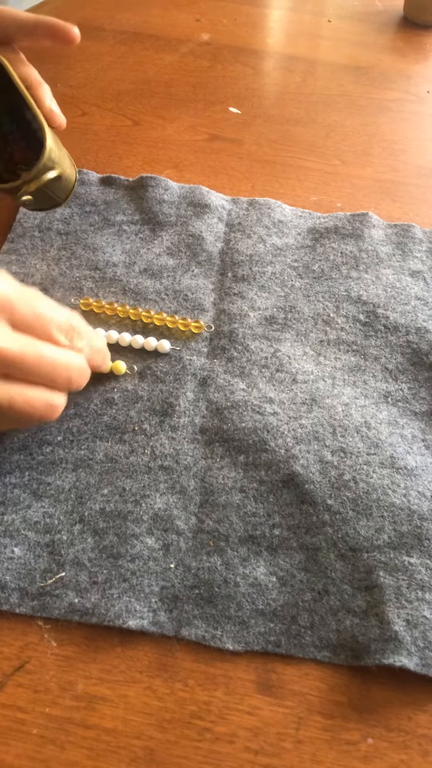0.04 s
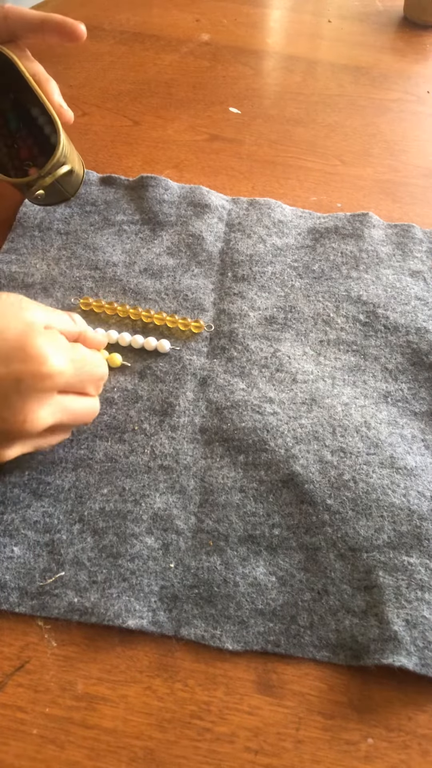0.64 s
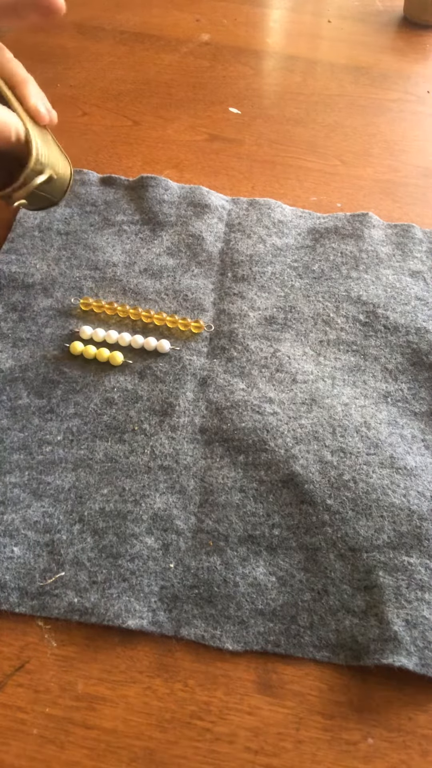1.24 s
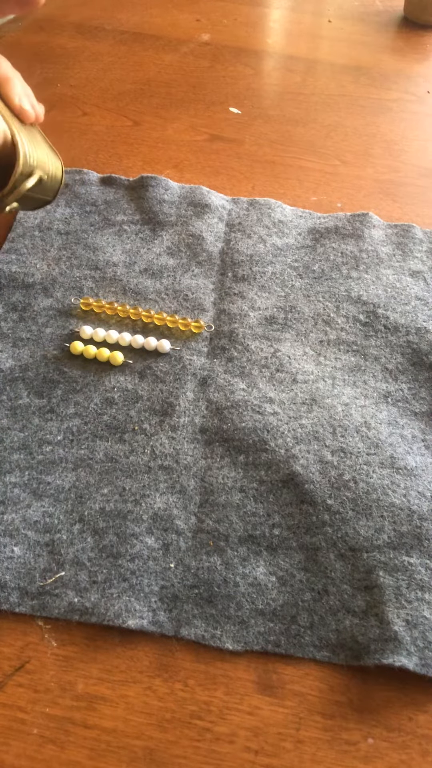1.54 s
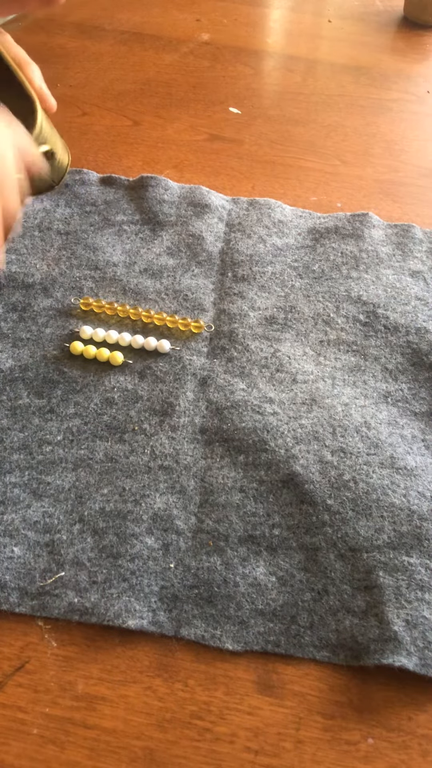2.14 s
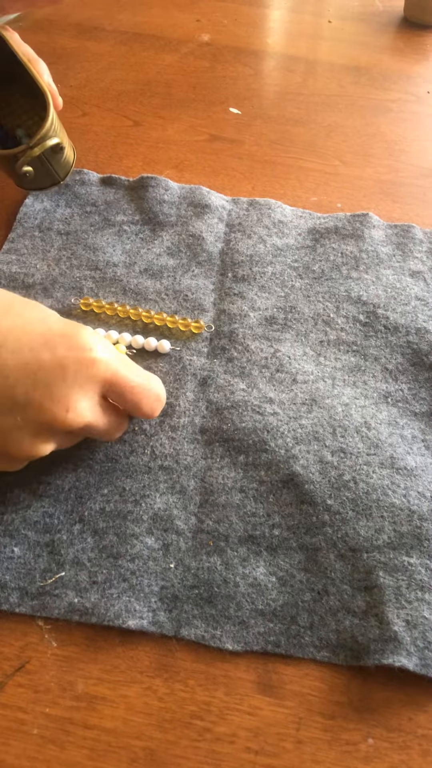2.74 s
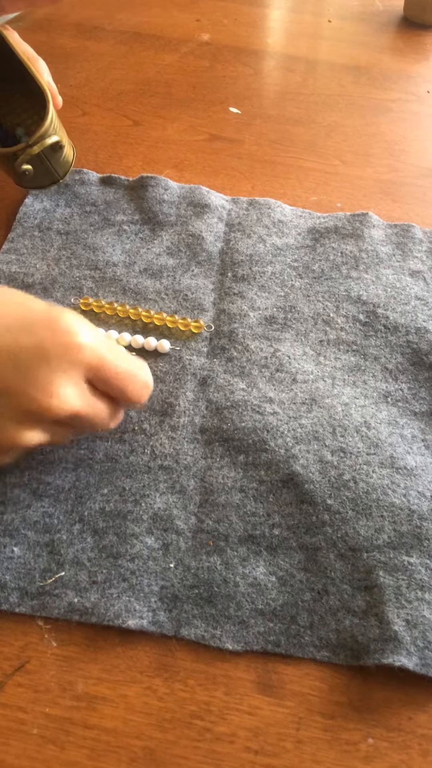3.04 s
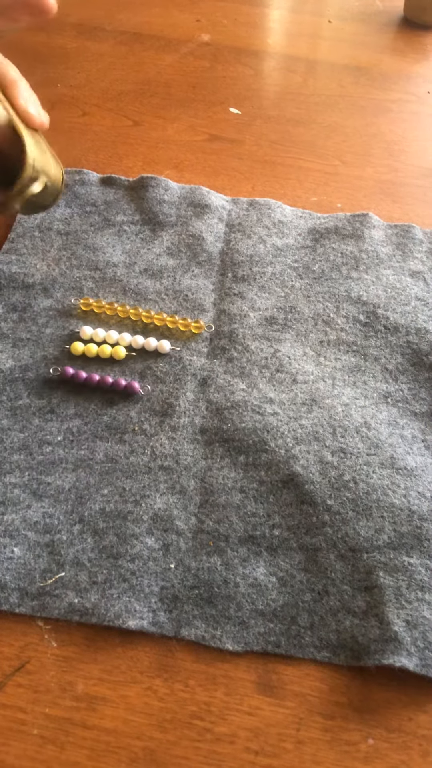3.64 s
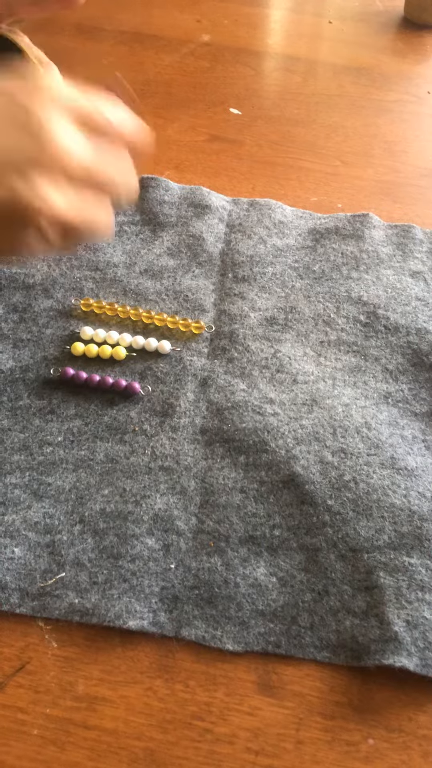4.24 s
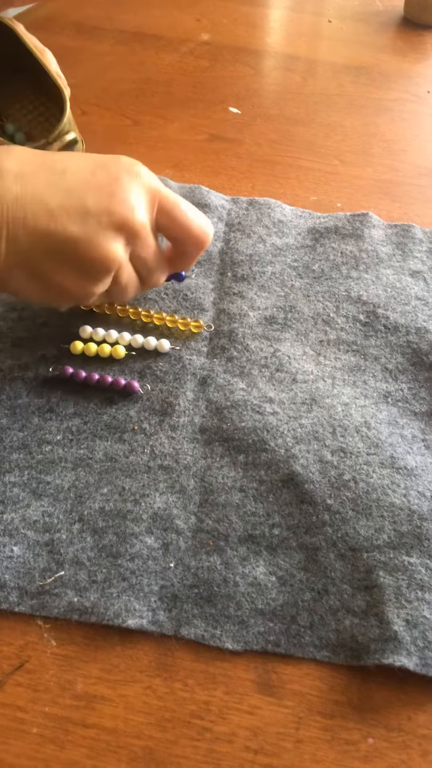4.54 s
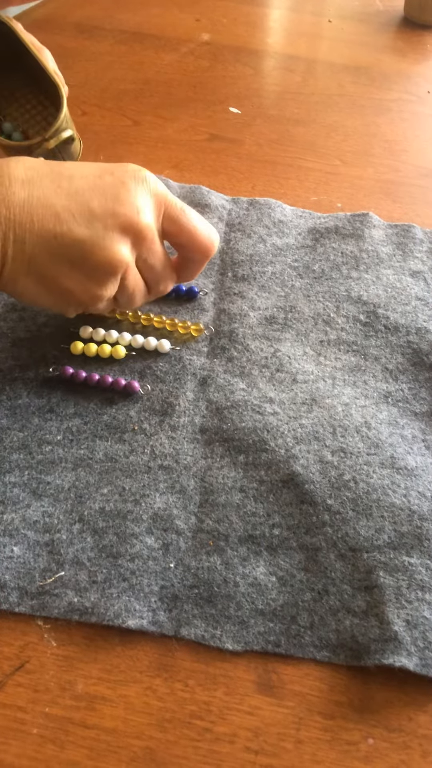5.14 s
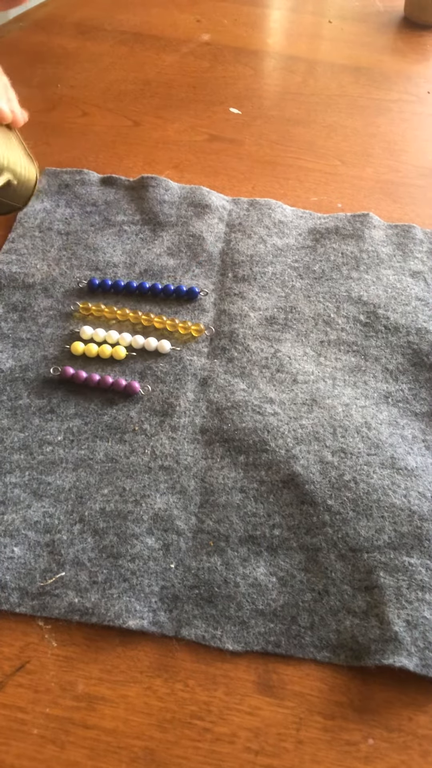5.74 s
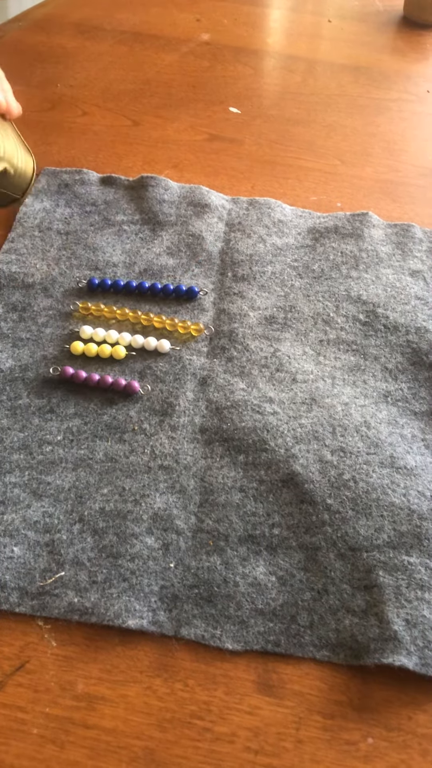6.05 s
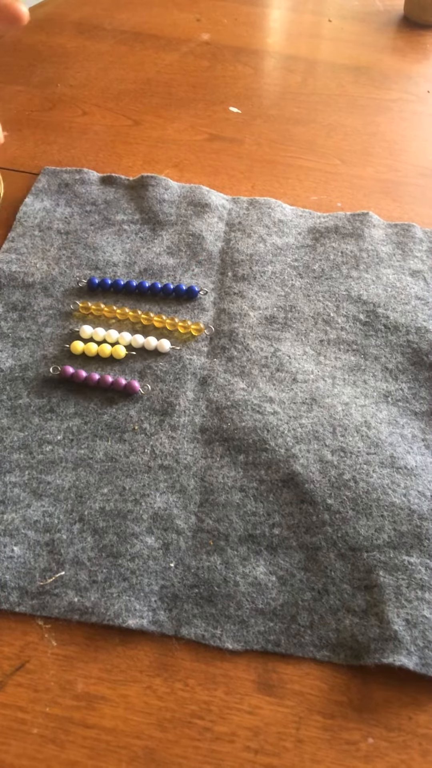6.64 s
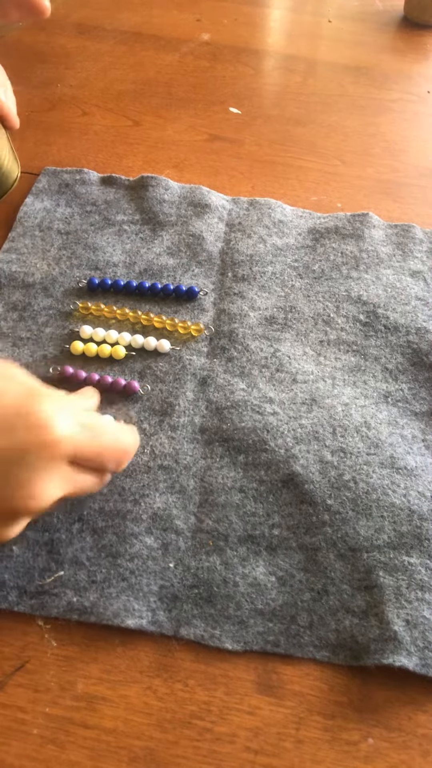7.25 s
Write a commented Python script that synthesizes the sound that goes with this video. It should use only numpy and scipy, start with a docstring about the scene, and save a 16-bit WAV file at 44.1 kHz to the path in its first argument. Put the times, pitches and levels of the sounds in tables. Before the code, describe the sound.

Fingers pick bead bars out of a small metal tin three times. Each time the beads clack against each other and the wall for about a second, rattling finely and making the tin ring briefly at a slightly different pitch. In the pauses come faint ticks of beads on a felt mat and soft bumps on the table. The room is small, with a short echo, low hum and microphone hiss.

```python
"""Small room, table with a felt mat. Fingers pick bead bars out of a small metal tin, three times.
Beads clack on each other and the wall, ringing the tin, and rattle finely as they roll. The tin is
held level, then leaning, then tipped; each grip has its own resonances. Faint ticks and a brush on
the mat, soft bumps on the table. Short room echo; behind it low air, hum and microphone hiss."""
import sys
import numpy as np
from scipy import signal
from scipy.fft import rfft, irfft
from scipy.io import wavfile

SR = 44100
rng = np.random.default_rng(int(sys.argv[2]) if len(sys.argv) > 2 else 0)


def inscribe(sig):
    """Save sig as 16-bit PCM at rate SR to the path in sys.argv[1].

    A 1-D sig is mono; a 2-D sig holds one channel per row.
    Samples are clipped to [-1, 1] before scaling.
    """
    pcm = np.round(np.clip(np.atleast_2d(sig).T, -1, 1) * 32767)
    wavfile.write(sys.argv[1], SR, pcm.astype(np.int16))


N = 321048
TIME_S = np.arange(N) / SR
LEAD_SAMPLES = 512  # scrape ahead of each contact

# bar strikes: t/s, crack level/dB, hollow/dB, wall/dB, edge/dB (these three added to level), clink f/Hz
STRIKES = [(1.089, -34, -15, -6, -19, 3750), (1.104, -29.5, -11.5, -9.5, -17, 2440),
           (1.175, -33, -23, -2.5, -15, 2350), (1.2213, -35, -20.5, -2, -17, 3370),
           (1.241, -29.5, -28, -7, -20, 2260), (1.27, -23, -12, -8, -15.5, 3470),
           (1.2885, -24.5, -9, -14, -13.5, 2300), (1.294, -15, -25, -10, -15.5, 2325),
           (1.308, -19.5, -18, -11.5, -10.5, 3300), (1.346, -21.5, -17.5, -13.5, -12.5, 6700),
           (1.353, -19, -20.5, -7, -11.5, 2240), (1.3763, -26.5, -16, -1.5, -9.5, 3150),
           (1.409, -30.5, -25, -1, -12.5, 3350), (1.4318, -23, -18, -6.5, -19.5, 2180),
           (1.4919, -17, -16, -13, -11.5, 7040), (1.503, -26, -12.5, -13, -8.5, 6130),
           (1.627, -24.5, -5.5, -14, -17.5, 2120), (1.6379, -13.5, -8, -12, -10.5, 2013),
           (1.681, -25.5, -23, -21.5, -11.5, 5800), (1.791, -42.5, -18, 1, -12, 2080),
           (1.843, -42, -18, -16, -10, 3620), (1.8588, -30.5, -14.5, -6.5, -15.5, 2180),
           (1.913, -31.5, -24, -10, -18, 3650), (1.9464, -28.5, -8, -13.5, -21, 5180),
           (1.9867, -36.5, -14, -6, -10, 5100), (2.048, -23, -30, -15, -14, 5210),
           (3.547, -25, -14.5, -12, -19.5, 4930), (3.554, -33, -17, -9, -13, 2360),
           (3.649, -25, -11.5, -19, -14, 3980), (3.663, -14, -17.5, -15, -11.5, 2390),
           (3.6705, -24, -8.5, -11.5, -8.5, 2210), (3.7155, -19.5, -28.5, -10.5, -14.5, 2110),
           (3.7265, -22.5, -18.5, -16, -16, 4640), (3.7627, -24, -9.5, -10.5, -20, 2300),
           (3.7852, -20.5, -6.5, -5, -20, 1990), (3.791, -13, -27, -24, -12.5, 4750),
           (3.796, -14.5, -19, -20.5, -15, 3740), (3.911, -25, -13.5, -8, -17, 3690),
           (3.9443, -20.5, -12.5, -7.5, -12, 1916), (4.0405, -27.5, -20, -20, -9, 6660),
           (4.0511, -26.5, -23, -15.5, -10, 4500), (5.77, -35, -12, -14, -27, 1870),
           (5.785, -33.5, -15, -14, -12.5, 2460), (5.816, -28, -16.5, -22.5, -15, 4640),
           (5.924, -21, -37, -15.5, -15, 4700), (5.9417, -19.5, -27.5, -13.5, -15.5, 4680),
           (6.023, -22.5, -33, -10, -1, 8100), (6.036, -9.5, -24.5, -19, -15.5, 2180),
           (6.203, -18.5, -26, -10, -10.5, 4880), (6.234, -19, -22, -18, -9.5, 7640),
           (6.2435, -17.5, -22.5, -9, -13.5, 2140), (6.251, -22, -11, -4.5, -11, 1944),
           (6.3295, -34, -26.5, -3.5, -16, 2220), (6.348, -25, -25, -19.5, -6.5, 5110),
           (6.453, -41.5, -19, -18, -8, 6400), (6.492, -44.5, -15, -7, -13.5, 2300),
           (6.542, -30, -29, -12, -13.5, 7500), (6.588, -29.5, -29, -11, -15, 4470),
           (6.625, -18.5, -23.5, -4.5, -13, 1947), (6.631, -16.5, -18.5, -23.5, -15, 1906),
           (6.655, -16, -25, -22.5, -11.5, 5000), (6.674, -27.5, -17, -23, -13, 3610),
           (6.7923, -48, -8, -0.5, -5, 2430)]
# limits of the hollow, wall, crack and edge bands: f/Hz
BAND_EDGES_HZ = [400, 1500, 3000, 8000, 16500]
# dead knock of a bead: f/Hz, level/dB
BEAD_SPECTRUM = [(200, -31.5), (500, -15.5), (1000, -4.5), (1600, -12.5), (2500, -7), (5000, -3),
                 (8000, -5), (8700, -10.5), (12000, -13), (16000, -15.5)]
# tin resonances, one table per grip: f/Hz, width/Hz, level/dB
LEVEL_MODES = [(584, 230, -5), (984, 120, 10), (1141, 87, 10), (1440, 110, -13.5), (2080, 47, -2),
               (2204, 97, -2), (2300, 76, -2.5), (2800, 66, -6.5), (3290, 110, 0.5), (3560, 150, 4),
               (3970, 200, 0.5), (4633, 160, 2), (4990, 93, 5.5), (5900, 200, -2), (6660, 240, 2),
               (7740, 460, -4), (10450, 500, -13.5)]
LEANING_MODES = [(573, 180, -3), (962, 71, 1), (1125, 70, 8), (1386, 35, 1), (1940, 31.7, -1),
                 (2204, 170, 0), (2800, 130, -5.5), (3544, 103, 3), (4000, 190, -1), (4700, 130, -0.5),
                 (4930, 130, -0.5), (5840, 140, -5), (8200, 380, -10.5)]
TIPPED_MODES = [(578, 45, -1), (836, 35, -17), (994, 48, 4.5), (1150, 48, -1), (1292, 54, 4.5),
                (1414, 16, 2), (1620, 28, -11), (1984, 59, 2.5), (2244, 110, 1), (2420, 140, 0),
                (2700, 150, -0.5), (3910, 140, 2.5), (5020, 210, 2.5), (5630, 210, -6), (6620, 400, -2.5),
                (7840, 230, -2)]
GRIP_MODES = [LEVEL_MODES, LEANING_MODES, TIPPED_MODES]
# level to leaning, leaning to tipped: t/s
GRIP_CHANGES_S = [3, 5]
# fingers pushing bars round the tin: t/s, length/s, level/dB
STIR_STROKES = [(1.1, 0.079, -50), (1.194, .008, -39), (1.298, 0.11, -39.5), (1.471, 0.13, -44.5),
                (1.572, .04, -49), (1.612, 0.013, -31), (1.655, 0.019, -35.5), (1.797, .1, -51),
                (1.91, .06, -45), (2.077, 0.044, -52.5), (3.41, 0.094, -59), (3.54, 0.0067, -40),
                (3.652, 0.019, -31.5), (3.69, 0.018, -42.5), (3.835, .015, -38), (3.87, .17, -42),
                (5.745, 0.05, -48.5), (5.902, .005, -52), (5.96, .025, -50), (6.014, 0.031, -35.5),
                (6.153, 0.034, -45.5), (6.196, 0.049, -30.5), (6.30, 0.058, -44), (6.579, 0.022, -43),
                (6.657, .11, -46.5)]
# beads touching on the mat: t/s, level/dB
MAT_TICKS = [(0.3443, -49.5), (.902, -59), (2.683, -52), (3.4195, -55), (4.268, -43.5), (4.278, -54),
             (4.881, -60), (6.41, -43)]
# one such tick: f/Hz, level/dB
TICK_SPECTRUM = [(500, -27.5), (2000, -12), (4000, -4), (6500, 6), (10000, -9), (16000, 1)]
# hand and tin on the table, thump then drag: t/s, length/s, level/dB
BUMP_STROKES = [(4.128, .017, -45), (5.25, .27, -57)]
# table thump: f/Hz, level/dB
BUMP_SPECTRUM = [(50, -20.5), (105, -0.5), (160, -3), (220, -4), (290, 1), (420, -12.5), (900, -20),
                 (3000, -45)]
# fingers on felt: t/s, length/s, level/dB
BRUSH_STROKES = [(5.33, .10, -71)]
# felt friction: f/Hz, level/dB
FELT_SPECTRUM = [(1000, -14), (4000, 1), (7000, 1), (11000, -9), (16000, -17)]
# room decay: f/Hz, T60/s
ROOM_T60_S = [(300, 0.09), (1200, 0.45), (3500, 0.29), (7000, 0.2), (14000, 0.21)]
# room air: f/Hz, relative level/dB
AIR_SPECTRUM = [(12, -55), (20, -30), (38, -20.5), (59, -7), (86, -12), (119, 1), (170, -5), (189, -4),
                (275, -10.5), (315, -10), (429, -12), (615, -13.5), (670, -15.5), (782, -12.5),
                (1200, -21.5), (1560, -59), (2640, -120)]
# room hum: f/Hz, width/Hz, level/dB
HUM_LINES = [(77.5, 3.4, -63), (117.5, 4.8, -61.2), (204.5, 6.4, -65), (230.9, 5.1, -65.5),
             (275.3, 10, -62.5)]
# microphone hiss: f/Hz, relative level/dB
HISS_SPECTRUM = [(700, -6.5), (1200, 4), (2000, 0), (4000, -7), (6000, -13.5), (7000, -11), (7750, -4),
                 (8300, -14), (9500, -21), (15500, -25.5), (16200, -35)]


def clacks(hollow_db=-8, wall_db=-8.5, crack_db=-17, edge_db=-7.5, grip_detune=0.0084, rms_window_s=0.025):
    """Each strike rings the tin, slightly retuned by the fingers; the spot hit sets the band balance."""
    out = np.zeros(N)
    bands_hz = zip(BAND_EDGES_HZ, BAND_EDGES_HZ[1:])
    filters = [signal.butter(3, band_hz, "band", fs=SR, output="sos") for band_hz in bands_hz]
    for t_s, level_db, hollow, wall, edge, clink_hz in STRIKES:
        modes = GRIP_MODES[np.searchsorted(GRIP_CHANGES_S, t_s)]
        tin = impulse_response(BEAD_SPECTRUM, modes, detune=grip_detune * rng.uniform(-1, 1))
        force = clink(chatter(contact_ms=1.38), clink_hz, ping_db=-11)
        ring = signal.fftconvolve(force, tin)
        offsets_db = [hollow + hollow_db, wall + wall_db, crack_db, edge + edge_db]
        for k, (sos, offset_db) in enumerate(zip(filters, offsets_db)):
            band = (-1) ** k * unit_energy(signal.sosfilt(sos, ring))  # alternating polarity
            gain = amp(level_db + offset_db) * np.sqrt(rms_window_s * SR)
            add(out, t_s - LEAD_SAMPLES / SR, gain * band)
    return out


def chatter(contact_ms, buzz_db=-17, buzz_ms=2.9, scrape_db=-14, scrape_ms=2.56):
    """Force of a landing bar: a scrape, a quick cluster of bead hits, then buzz on the wire."""
    t_ms = (np.arange(2048) - LEAD_SAMPLES) * 1000 / SR
    progress = abs(t_ms) / contact_ms
    hits = (0.1 + progress) * np.exp(-progress)
    buzz = amp(buzz_db) * np.exp(-abs(t_ms) / buzz_ms)
    scrape = amp(scrape_db) * np.exp(-abs(t_ms) / scrape_ms)
    return unit_energy(rng.standard_normal(len(t_ms)) * np.where(t_ms < 0, scrape, hits + buzz))


def clink(force, f_hz, ping_db, t60_s=0.016, rise_s=0.00073):
    """The struck spot adds a brief ping at its own pitch."""
    t_s = np.maximum(np.arange(len(force)) - LEAD_SAMPLES, 0) / SR
    envelope = amp(-60 * t_s / t60_s) * (1 - np.exp(-t_s / rise_s))
    ping = np.sin(2 * np.pi * f_hz * t_s) * envelope
    return force + amp(ping_db) * unit_energy(ping)


def impulse_response(spectrum, modes=(), detune=0):
    """A struck body: broad knock plus ringing modes, shifted by the fraction detune."""
    f_hz = abs(np.fft.fftfreq(4096, 1 / SR))
    power = amp(lookup(spectrum, f_hz)) ** 2
    for mode_hz, width_hz, level_db in modes:
        offset_sq = ((f_hz - mode_hz * (1 + detune)) / width_hz) ** 2
        power += amp(level_db) ** 2 / (1 + 4 * offset_sq) / (1 + offset_sq / 4)
    minimum_phase = np.exp(np.conj(signal.hilbert(np.log(power) / 2)))
    return unit_energy(np.fft.ifft(minimum_phase).real)


def rolling(gain_db=-3, scrape_db=-12, lowpass_hz=12000, spread_db=17, touches_per_s=8):
    """Stirred beads: many small contacts at 24 clink pitches ring the tin, over fine scraping."""
    contacts = np.zeros(N)
    touches_per_pitch = int(touches_per_s * N / SR)
    for clink_hz in np.geomspace(2000, 8000, 24):
        touch = clink(chatter(contact_ms=1.0), clink_hz, ping_db=-8.5)
        for t_s, level_db, side in rng.random((touches_per_pitch, 3)) * [N / SR, spread_db, 2]:
            add(contacts, t_s, amp(level_db) * np.sign(side - 1) * touch)
    force = unit_rms(contacts) + amp(scrape_db) * rng.standard_normal(N)
    lowpass = signal.butter(1, lowpass_hz, fs=SR, output="sos")  # the rolling's treble is gently darkened throughout
    force = signal.sosfilt(lowpass, force)
    out = np.zeros(N)
    for grip, modes in enumerate(GRIP_MODES):
        strokes = [row for row in STIR_STROKES if np.searchsorted(GRIP_CHANGES_S, row[0]) == grip]
        drive = force * stroke_envelope(strokes, rise_s=0.0035, fall_s=0.015)
        out += signal.oaconvolve(drive, impulse_response(BEAD_SPECTRUM, modes))[:N]
    return amp(gain_db) * out


def mat_and_table(tick_gain_db=15):
    """Fingers brush the felt, hand and tin bump the table, beads tick together on the mat."""
    brush = noise(FELT_SPECTRUM) * stroke_envelope(BRUSH_STROKES, rise_s=0.024, fall_s=0.021)
    bumps = noise(BUMP_SPECTRUM) * stroke_envelope(BUMP_STROKES, rise_s=0.0082, fall_s=0.017)
    ticks = np.zeros(N)
    for t_s, level_db in MAT_TICKS:
        force = chatter(contact_ms=0.4, buzz_db=-27, scrape_db=-35)
        tick = signal.fftconvolve(force, impulse_response(TICK_SPECTRUM))
        add(ticks, t_s - LEAD_SAMPLES / SR, amp(level_db + tick_gain_db) * tick)
    return brush + bumps + ticks


def room(x, tail_db=-8, onset_s=0.0012, early_db=-13, early_peak_s=0.0029, echoes_per_s=1500):
    """Sparse echoes off the table and near things, plus a tail lasting longest in the mids."""
    size = 26000
    t_s = np.arange(size) / SR
    f_hz, frame_s, frames = signal.stft(rng.standard_normal(size), SR, nperseg=256)
    decay = amp(-60 * frame_s / lookup(ROOM_T60_S, f_hz)[:, None])
    tail = signal.istft(frames * decay, SR, nperseg=256)[1][:size]
    tail *= 1 - np.exp(-(t_s / onset_s) ** 2)
    early = rng.standard_normal(size) * (rng.random(size) < echoes_per_s / SR)
    early *= t_s * np.exp(-t_s / early_peak_s)
    echoes = amp(tail_db) * unit_energy(tail) + amp(early_db) * unit_energy(early)
    return x + signal.oaconvolve(x, echoes)[:N]


def background(air_db=-51.5, hiss_db=-63):
    """Low room air, microphone hiss and a wavering hum of narrow noise bands."""
    f_hz = np.fft.rfftfreq(N, 1 / SR)
    hum = np.zeros(N)
    for line_hz, width_hz, level_db in HUM_LINES:
        line = rfft(rng.standard_normal(N)) / (1 + ((f_hz - line_hz) / width_hz) ** 2)
        hum += amp(level_db) * unit_rms(irfft(line, N))
    return amp(air_db) * noise(AIR_SPECTRUM) + amp(hiss_db) * noise(HISS_SPECTRUM) + hum


def noise(spectrum):
    """Steady shaped noise, rms 1."""
    gain = amp(lookup(spectrum, np.fft.rfftfreq(N, 1 / SR)))
    return unit_rms(irfft(rfft(rng.standard_normal(N)) * gain, N))


def stroke_envelope(strokes, rise_s, fall_s):
    """Gain over time: strokes swell, hold and decay, summed in power."""
    power = np.zeros(N)
    for t_s, length_s, level_db in strokes:
        before = np.maximum(t_s - TIME_S, 0) / rise_s
        after = np.maximum(TIME_S - t_s - length_s, 0) / fall_s
        power += amp(level_db) ** 2 * np.exp(-2 * np.minimum(before + after, 20))
    return np.sqrt(power)


def lookup(table, f_hz):
    """Interpolates over log frequency."""
    points_hz, values = np.transpose(table)
    return np.interp(np.log(f_hz + 1), np.log(points_hz + 1), values)


def add(mix, t_s, sound):
    part = mix[max(round(t_s * SR), 0):][:len(sound)]
    part += sound[:len(part)]


def amp(level_db):
    return 10 ** (np.asarray(level_db) / 20)


def unit_rms(x):
    return x / np.sqrt(np.mean(x ** 2) + 1e-20)


def unit_energy(x):
    return x / np.linalg.norm(x)


def scene():
    """Tin, mat and table in the room; mono."""
    direct = clacks() + rolling() + mat_and_table()
    return (room(direct) + background())[None]


def record(dry):
    """Band limit, 28 Hz to 16050 Hz."""
    highpass = signal.butter(2, 28, "high", fs=SR, output="sos")
    lowpass = signal.firwin(511, 16050, window=("kaiser", 9), fs=SR)
    return signal.oaconvolve(signal.sosfilt(highpass, dry), lowpass[None], "same")


dry = scene()
out = record(dry)
inscribe(out)
```